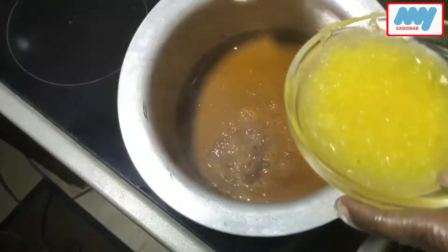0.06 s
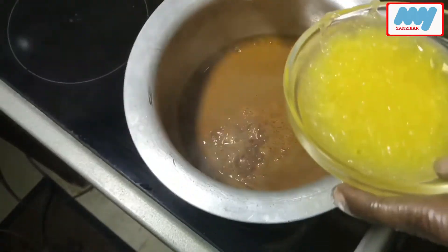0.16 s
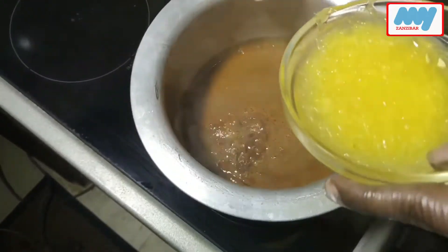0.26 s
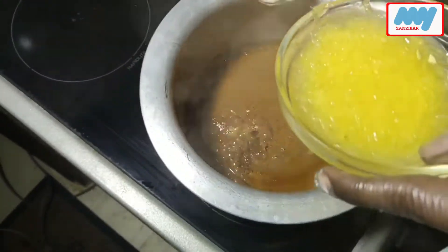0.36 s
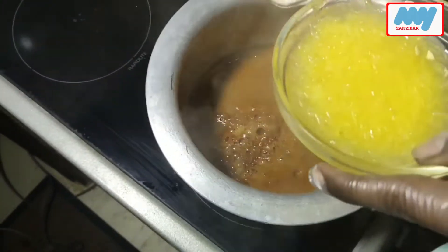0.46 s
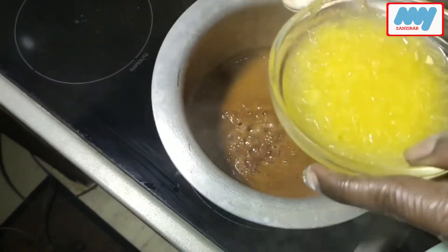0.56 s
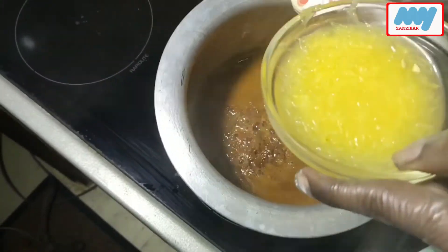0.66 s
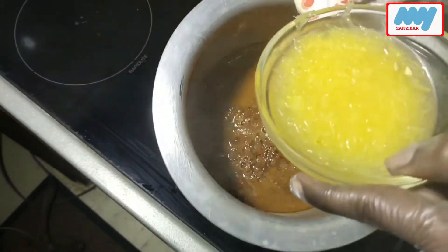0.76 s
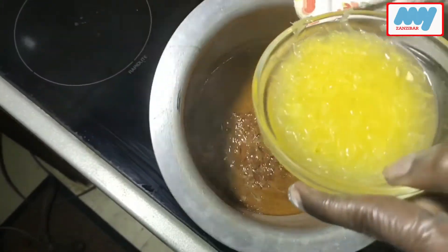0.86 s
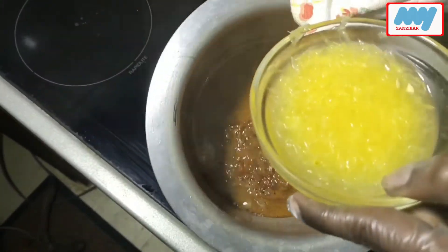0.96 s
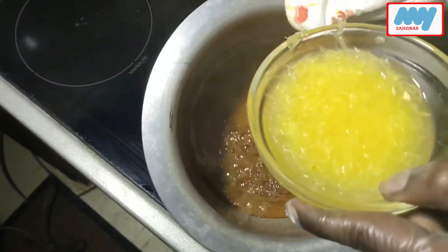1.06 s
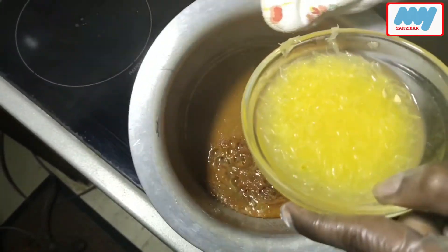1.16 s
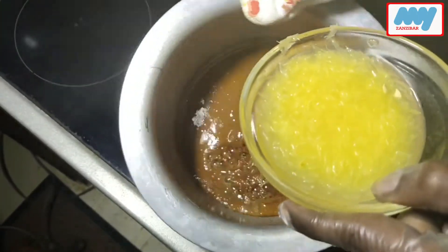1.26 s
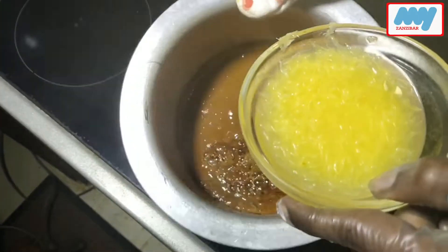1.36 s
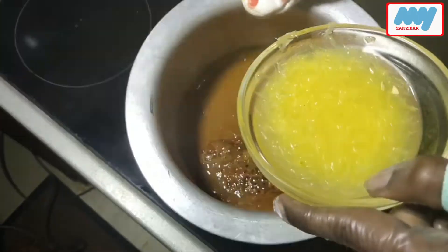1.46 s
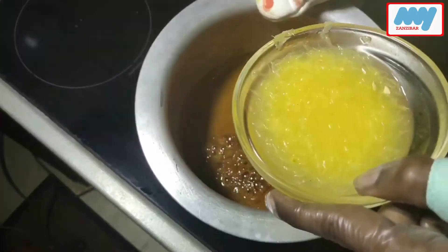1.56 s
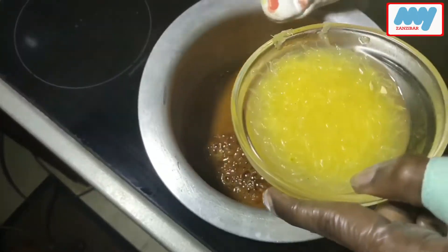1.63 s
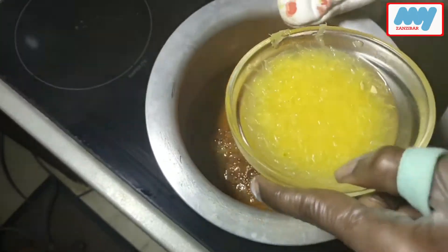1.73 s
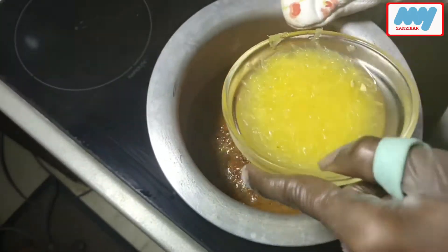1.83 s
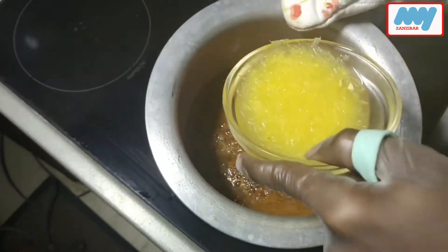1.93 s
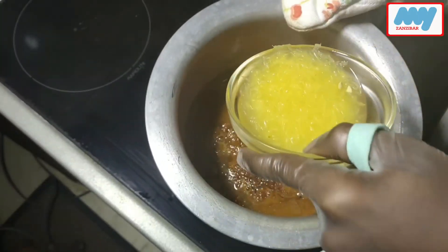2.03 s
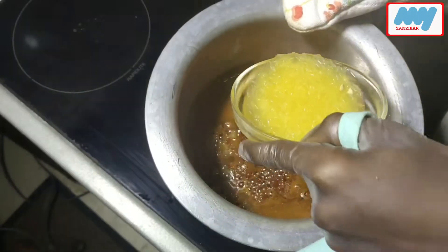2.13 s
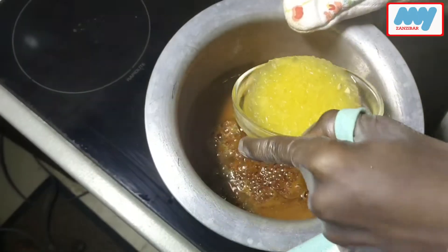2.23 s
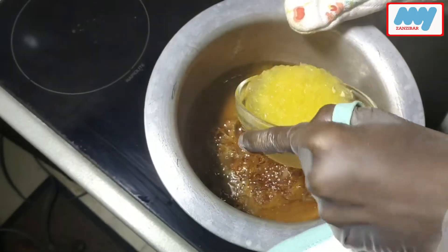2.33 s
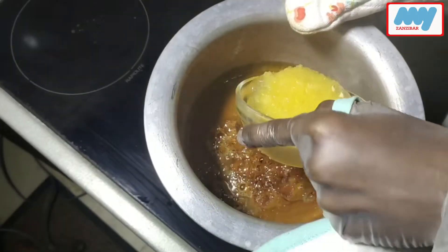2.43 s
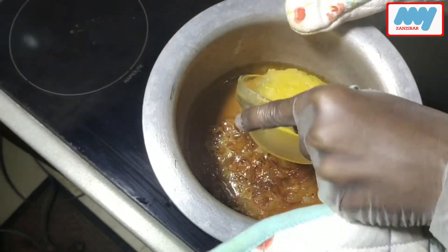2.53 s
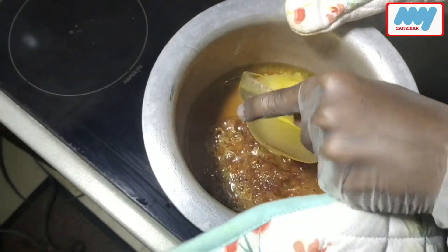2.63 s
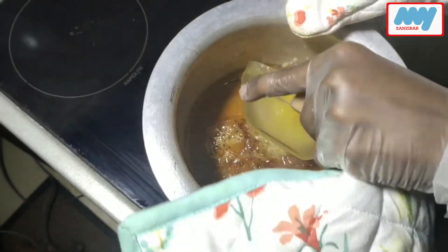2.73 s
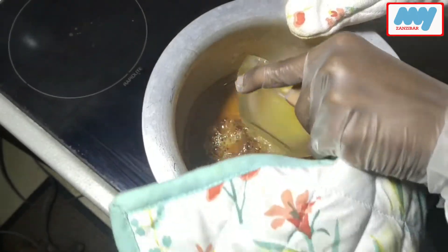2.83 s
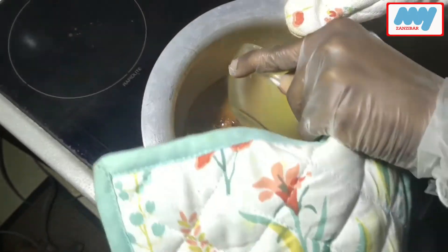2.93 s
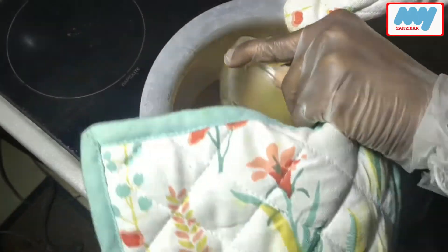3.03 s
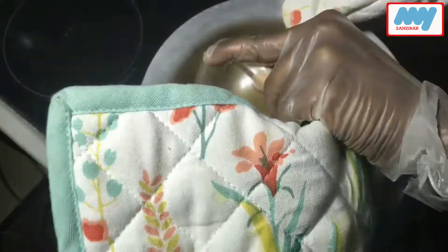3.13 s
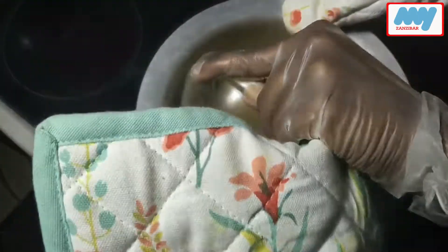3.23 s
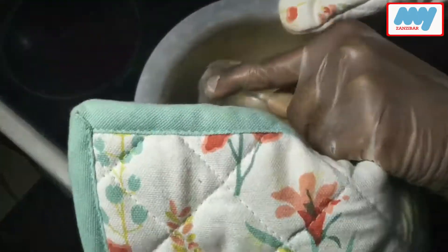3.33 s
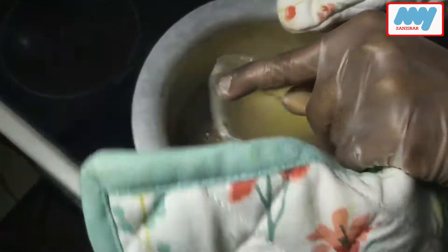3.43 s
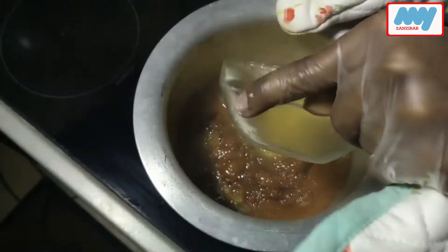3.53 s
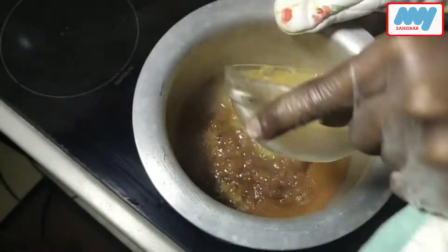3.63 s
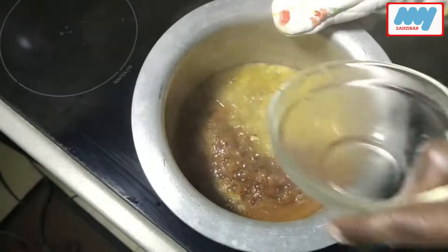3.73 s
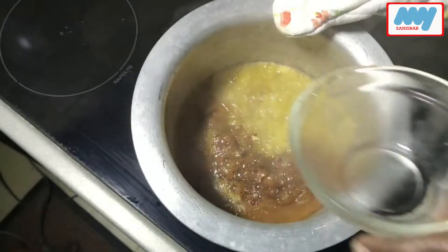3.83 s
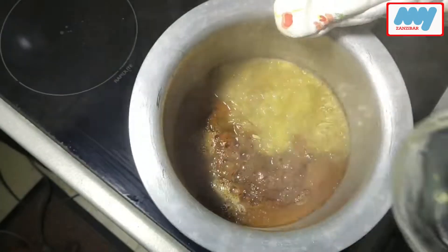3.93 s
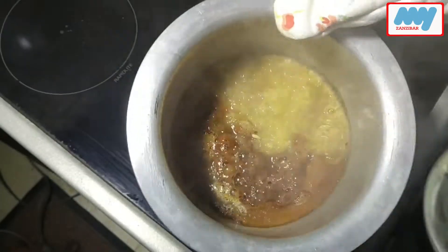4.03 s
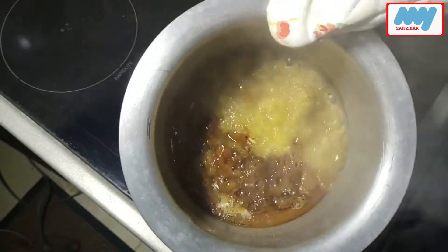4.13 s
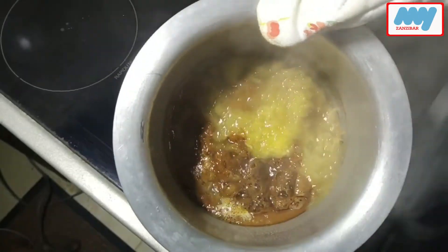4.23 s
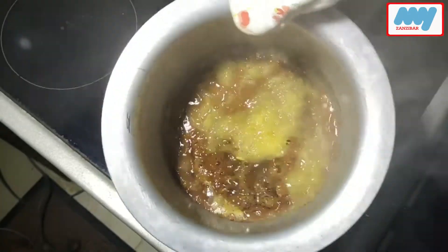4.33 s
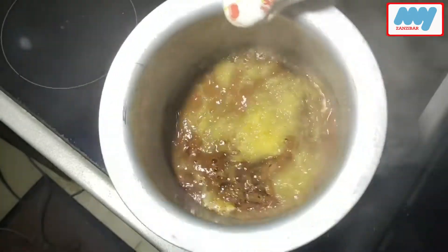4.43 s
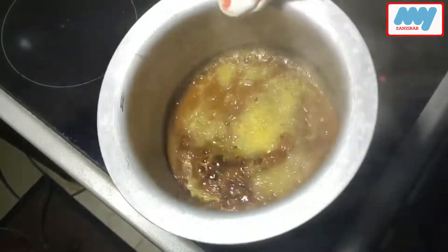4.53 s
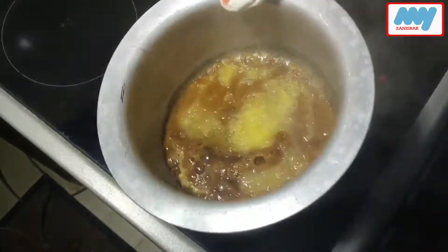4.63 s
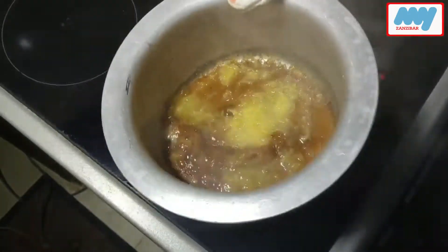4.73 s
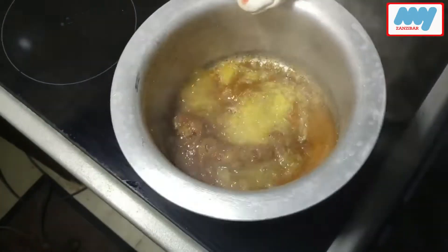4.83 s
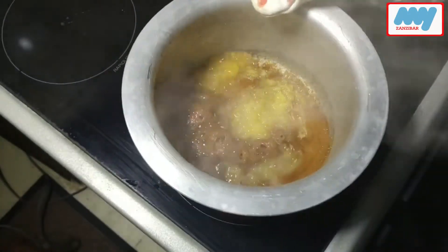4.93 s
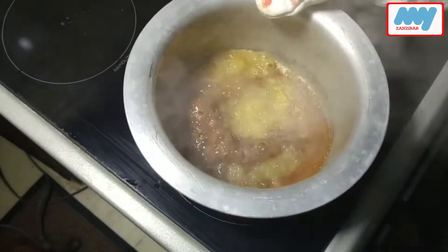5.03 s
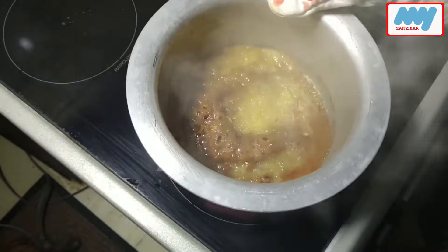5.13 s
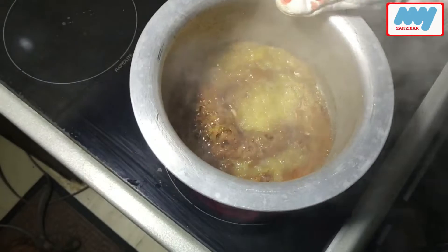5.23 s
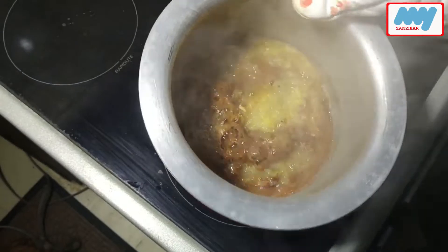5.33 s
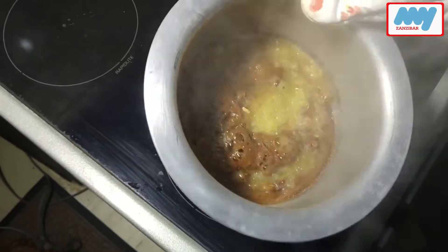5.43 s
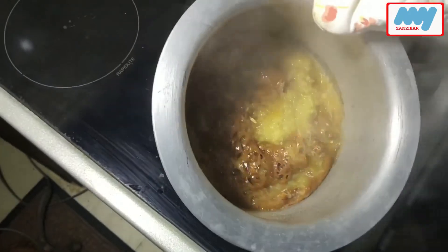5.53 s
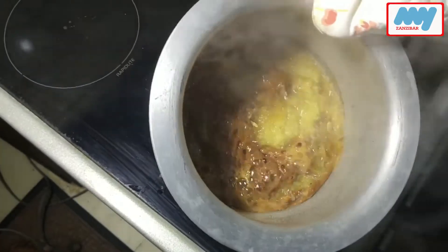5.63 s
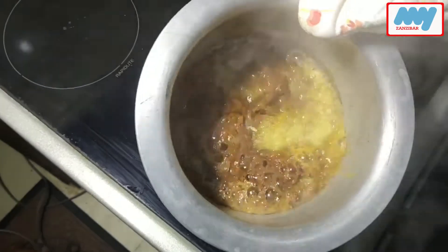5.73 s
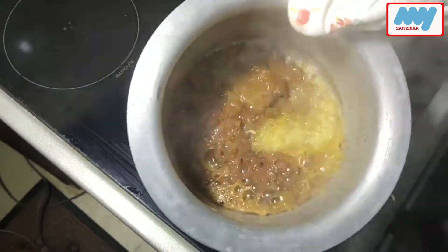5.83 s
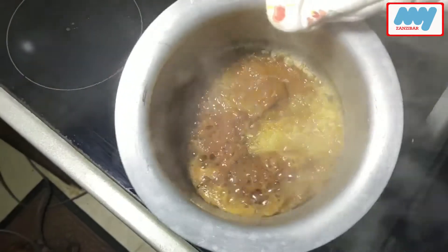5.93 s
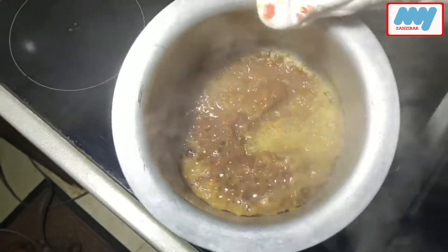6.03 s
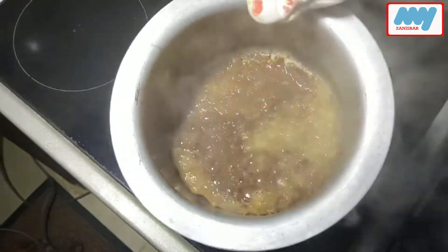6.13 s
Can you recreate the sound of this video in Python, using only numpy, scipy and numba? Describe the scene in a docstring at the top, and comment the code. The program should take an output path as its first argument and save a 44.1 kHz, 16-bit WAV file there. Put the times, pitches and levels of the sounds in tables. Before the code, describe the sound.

Close-up simmering syrup crackles softly, then juice slides in and the boil surges with bright hissing and hollow bubbling over a faint fan hum.

```python
"""Juice poured into boiling syrup

Juice is tipped from a glass bowl into hot sugar syrup in an aluminium pot, heard from just above the rim.
Tiny steam bubbles fizz and spurt, larger ones ring the air in the pot, and the boil swells as the juice spreads.
The bowl shades and retunes the pot while it is inside; the pot knocks dully on the hob, whose fan hums underneath.
Bubbles are short rising sines, the pot's air is resonant filters, knocks are dying modes, hiss is shaped noise.
"""
import sys
import numpy as np
from scipy import signal
from scipy.fft import rfft, irfft
from scipy.io import wavfile
from scipy.ndimage import uniform_filter1d, map_coordinates
from numba import njit

SR = 44100
rng = np.random.default_rng(int(sys.argv[2]) if len(sys.argv) > 2 else 0)


def persist_wave(psi):
    """Save psi, clipped to +-1, as 16-bit WAV."""
    counts = np.round(np.clip(psi, -1, 1) * 32767).astype(np.int16)
    wavfile.write(sys.argv[1], SR, np.atleast_2d(counts).T)


N = 272802
TIME = np.arange(N) / SR


def undb(db):
    """Decibels to gain."""
    return 10 ** (np.asarray(db) / 20)


def unit(x):
    """Scale to an rms of 1."""
    return x / np.sqrt(np.mean(x ** 2))


def curves(table):
    """The columns of a table, joined by straight lines in time."""
    times, *columns = np.transpose(table)
    return [np.interp(TIME, times, column) for column in columns]


def bell(s, length):
    """A smooth swell of height 1 around time s."""
    return np.exp(-((TIME - s) / length) ** 2)


def flare(s, attack, hold, fall_db_per_s):
    """Gain that grows to 1 at time s, holds and then dies away."""
    growth = np.exp(np.minimum(TIME - s, 0) / attack)
    fall = undb(-fall_db_per_s * np.maximum(TIME - s - hold, 0))
    return growth * fall


def walk(rate):
    """Smooth random drift that changes about rate times a second; rms 1."""
    hold = max(int(SR / rate), 1)
    steps = np.repeat(rng.standard_normal(N)[:N // hold + 1], hold)
    return unit(uniform_filter1d(steps, hold)[:N])


def colour(x, points):
    """Filter by a gain curve of (frequency [Hz], gain [dB]) points; rms 1."""
    hz, db = np.transpose(points)
    bins = np.maximum(np.fft.rfftfreq(N, 1 / SR), 1)
    gain = undb(np.interp(np.log(bins), np.log(hz), db))
    return unit(irfft(rfft(x) * gain, N))


@njit
def bandpass(x, hz, width):
    """State-variable resonance whose centre and width may move."""
    y, band, low = np.empty(len(x)), 0., 0.
    for i in range(len(x)):
        g, k = np.tan(np.pi * hz[i] / SR), width[i] / hz[i]
        v = (band + g * (x[i] - low)) / (1 + g * (g + k))
        band, low, y[i] = 2 * v - band, low + 2 * g * v, k * v
    return y


@njit
def ring(start, hz, cycles, size, glide):
    """Each bubble is a dying sine that rises in pitch as it nears the surface."""
    out = np.zeros(N)
    for k in range(len(start)):
        length = int(cycles[k] * SR / hz[k]) + 2
        step = 2 * np.pi * hz[k] / SR
        z = size[k] + 0j
        turn = np.exp(1j * step - 5.75 / length)  # rotation and decay per sample
        bend = np.exp(1j * step * glide / length)
        for i in range(start[k], min(start[k] + length, N)):
            z *= turn
            turn *= bend
            out[i] += z.imag
    return out


def bubbles(low_hz, high_hz, cycles, spread_db, glide, count):
    """A swarm at random times and pitches, even in energy across pitch; spread_db makes a few bubbles louder."""
    when, pitch, life, chance = rng.random((count, 4)).T
    hz = low_hz + (high_hz - low_hz) * pitch
    turns = cycles * 2 ** (4 * life - 2)  # a quarter to four times the typical life
    rarity = -np.log(chance + .002)
    size = undb(spread_db * rarity) * np.sqrt(hz / turns)
    return unit(ring((when * N).astype(np.int64), hz, turns, size, float(glide)))


def pot_walls(x, echo_db, sway, count=5):
    """Faint echoes between the pot's walls; their paths drift as the microphone and bowl move."""
    out, samples = x, np.arange(N)
    for k, lag in enumerate(np.geomspace(.0012, .007, count)):  # mean delays in s
        path = lag * SR * (1 + sway * walk(5))
        echo = map_coordinates(x, [samples - path], order=3)
        out = out + (-1) ** k * undb(echo_db) * echo
    return unit(out)


def pot_air(x, modes, cover, tuning, narrowing):
    """Ring the air in the pot; a covered pot leaks less, so its resonances sharpen."""
    out = 0
    for hz, width, db, shade_db in modes:
        centre = hz * tuning * (1 + 0.017 * walk(6))  # the heaving surface retunes each one
        wide = width * np.exp(-narrowing * (cover - .5))
        rung = bandpass(bandpass(x, centre, 2 * wide), centre, 2 * wide)
        out = out + undb(db + shade_db * cover ** 2) * rung * np.sqrt(width / wide)
    return unit(out)


def echoes(x, t60, wet_db):
    """Add a dense tail of reflections, here decaying noise."""
    t = TIME[:SR // 2]
    tail = rng.standard_normal(len(t)) * undb(-60 * t / t60) * (t > .001)
    return x + undb(wet_db) * signal.fftconvolve(x, tail / np.linalg.norm(tail))[:N]


# the sizzle flares up as juice reaches fresh hot syrup:
# (time [s], level [dB], attack time constant [s], hold [s], brightness [dB])
SIZZLE_SURGES = [(0.05, -29, 0.15, .03, -1), (1.063, -39, 0.056, .1, -1), (1.27, -32.5, 0.063, 0.074, 5),
                 (2.862, -37.5, 0.053, 0.39, 4.5), (3.756, -24, 0.35, 0.16, -0.8),
                 (4.29, -25.5, 0.6, 0.19, 0.9), (4.887, -23, 0.24, 0.15, -0.5),
                 (5.332, -27.5, 0.21, 0.28, -3.5), (5.718, -20, 0.048, 0.33, -1.2),
                 (6.155, -22, 0.072, .05, 6)]
SURGE_FALL_DB_PER_S = 23.5  # a surge dies away as the spot cools
REST_FIZZ_DB, REST_BRIGHT_DB = -42.8, -0.5  # the syrup's own fizz between surges


def surges():
    """Fizz level and brightness in dB: surges add power to the resting fizz, and the louder ones weigh most."""
    power = undb(REST_FIZZ_DB) ** 2
    bright = power * REST_BRIGHT_DB
    for s, db, attack, hold, bright_db in SIZZLE_SURGES:
        share = (undb(db) * flare(s, attack, hold, SURGE_FALL_DB_PER_S)) ** 2
        power = power + share
        bright = bright + share * bright_db
    return 10 * np.log10(power), bright / power


# colour of the fizz and spurts, as a filter curve: (frequency [Hz], gain [dB])
FIZZ_COLOUR = [(900, -58), (1800, -12.5), (2500, -9), (3140, -7.5), (3860, -6), (5130, -3), (6200, -4),
               (7600, -3), (8600, 0.5), (10000, -0.5), (11200, -3.3), (13000, -9), (15000, -12.5),
               (15800, -14)]


def fizz(fizz_db, bright_db, cover):
    """Pinhead steam bubbles burst in flurries over a smooth hiss of vapour."""
    burst = bubbles(1895, 15890, cycles=39, spread_db=1.5, glide=0.047, count=44000)
    spits = bubbles(1860, 15100, cycles=7.2, spread_db=1.5, glide=.03, count=2200)
    # single spits stand out while the bowl is low
    spits = undb(-15.5 + 16.0 * cover ** 2) * spits
    vapour = undb(5.0) * rng.standard_normal(N)
    spray = pot_walls(burst + spits + vapour, echo_db=-20.5, sway=0.0324)
    spray = colour(spray, FIZZ_COLOUR)
    # each surge has its own brightness; the bowl shades the highest bubbles
    highpass = signal.butter(2, 8500, "high", fs=SR, output="sos")
    fine = signal.sosfiltfilt(highpass, spray)
    spray = spray + fine * (undb(bright_db - 4.5 * cover ** 2) - 1)
    flurry_db = (0.83 + 0.15 * cover) * walk(70) + 0.25 * walk(8)
    return spray * undb(fizz_db + flurry_db)


# spurts of steam that stand out at their moment: (time [s], level [dB], main bubble pitch [Hz])
CLEAR_SPURTS = [(0.965, -36, 9500), (1.071, -35.5, 6900), (1.536, -32.5, 8500), (1.649, -31, 9400),
                (1.761, -32.5, 10100), (1.833, -36, 9310), (1.953, -35, 10100), (2.018, -38, 7900),
                (2.123, -39.5, 7900), (2.168, -40, 6913), (2.196, -36, 5150), (2.31, -35.5, 5900),
                (2.403, -40, 8000), (2.55, -38, 7450), (2.689, -43, 8150), (2.76, -40.5, 7200),
                (2.836, -31, 4930), (2.973, -33.5, 5040), (3.03, -31, 9400), (3.095, -29.5, 10700),
                (4.29, -26, 10100), (5.024, -23.5, 5200), (6.108, -21.5, 11500)]
SPURT_S = 0.016  # length of a spurt, between its 1/e power points
SMALL_SPURTS_PER_S, SMALL_SPURT_DB = 11, -39.5  # other small ones come at random


def spurts():
    """Each spurt is a quick puff of crackling bubbles, many of much the same size."""
    clear = sum(undb(db) ** 2 * bell(s, SPURT_S / 2) for s, db, _ in CLEAR_SPURTS)
    starts = rng.random(N) < SMALL_SPURTS_PER_S / SR
    puff = bell(2 * SPURT_S, SPURT_S / 2)
    small = np.abs(signal.fftconvolve(starts * undb(SMALL_SPURT_DB) ** 2, puff)[:N])
    pitch = curves(CLEAR_SPURTS)[-1]  # glides from one spurt's pitch to the next
    swarm = bubbles(2070, 15860, cycles=33, spread_db=4.0, glide=.03, count=30000)
    swarm = colour(swarm, FIZZ_COLOUR)
    alike = bandpass(rng.standard_normal(N), pitch, .12 * pitch)
    return unit(swarm + undb(-3.0) * unit(alike)) * np.sqrt(clear + small)


# juice slides out of the bowl in gushes:
# (time [s], level [dB], bell half-length [s], pitch of the gap between bowl and syrup [Hz])
JUICE_GUSHES = [(2.86, -41, 0.024, 2510), (2.983, -36.5, 0.037, 2510), (3.35, -44, 0.15, 2730),
                (3.9, -47, .2, 3300)]


def pour():
    """Juice foams up under the lip of the bowl, in a gap whose pitch rises as the bowl lifts."""
    power = sum(undb(db) ** 2 * bell(s, length) for s, db, length, _ in JUICE_GUSHES)
    gap_hz = curves(JUICE_GUSHES)[-1]
    foam = bubbles(1730, 4200, cycles=9.3, spread_db=2.5, glide=.06, count=7000)
    width = np.full(N, 650.)  # Hz
    gap = bandpass(bandpass(foam, gap_hz, width), gap_hz, width)
    return unit(gap) * np.sqrt(power)


# upper air resonances of the pot, before the bowl retunes and sharpens them:
# (frequency [Hz], width at half cover [Hz], relative level [dB], change under full cover [dB])
UPPER_AIR = [(1144, 173, -0.3, -2), (1603, 160, 2, 6), (2106, 390, -5, 2), (2660, 314, -0.9, 1),
             (3070, 300, -2.5, 4), (5160, 150, -3, -23)]


def simmer(simmer_db, cover, tuning):
    """Larger bubbles pop and ring the upper air resonances of the pot."""
    pops = bubbles(814, 5965, cycles=20.3, spread_db=0.0, glide=0.066, count=20000)
    return pot_air(pops, UPPER_AIR, cover, tuning, narrowing=0.89) * undb(simmer_db - 1.3)


# the pot's deepest air resonances, its hollow note, before the bowl retunes and sharpens them:
# (frequency [Hz], width at half cover [Hz], relative level [dB], change under full cover [dB])
HOLLOW_AIR = [(514, 11, 1.5, 3.5), (621.4, 89, 3, 0.5), (708, 55, 2.5, -5)]
# single large blisters burst: (time [s], level [dB])
LARGE_BLISTERS = [(2.064, -34), (2.628, -47), (2.718, -31.5), (2.757, -35), (3.67, -36), (4.666, -28)]


def hollow(hollow_db, cover, tuning, blister_s=0.0029):
    """Thick blisters of syrup plop into the pot's deepest resonances."""
    plops = bubbles(442, 922, cycles=7.2, spread_db=1.0, glide=0.034, count=4500)
    large = sum(undb(db) ** 2 * bell(s, blister_s) for s, db in LARGE_BLISTERS)
    note = pot_air(plops, HOLLOW_AIR, cover, tuning, narrowing=1.0)
    return note * np.sqrt(undb(hollow_db) ** 2 + large)


# low churning of the boiling syrup, as a filter curve: (frequency [Hz], gain [dB])
CHURN_COLOUR = [(25, -22), (70, -4.5), (120, -3.5), (175, 0.5), (260, -8.5), (350, -5.5), (480, -7.5),
                (900, -3.5), (1300, 1.5), (2000, 3), (3000, 0.5), (6000, -36)]


def churn(simmer_db, cover):
    """The rolling liquid rumbles with the boil, muffled when the bowl is right inside the pot."""
    roll = bubbles(49, 3680, cycles=2.94, spread_db=1.5, glide=0.071, count=18000)
    muffling_db = 16.7 * cover ** 1.96
    return colour(roll, CHURN_COLOUR) * undb(simmer_db - 5.0 - muffling_db + 1.3 * walk(14))


# blows of the pot on the hob: (time [s], thud drive [dB], clack drive [dB], tick drive [dB])
POT_KNOCKS = [(.5815, -19.5, -26, -18), (0.692, -24.5, -26.5, -36), (1.822, -29, -34, -17),
              (1.877, -30, -27, -44), (3.9561, -16, -13, -47), (5.0619, -6.5, -17, -7.5),
              (5.193, -20, -25, -42)]
# modes of the pot on the hob:
# (frequency [Hz], level added to the drive [dB], t60 [s], part [0 thud, 1 clack, 2 tick])
KNOCK_MODES = [(70, -20, 0.24, 0), (161, -24, 0.089, 0), (180.5, -2.5, 0.087, 0), (259, -3, 0.039, 0),
               (304.5, -16.5, 0.11, 0), (577, 4, 0.019, 1), (1160, 4.5, 0.0039, 2), (1360, -11, 0.0048, 2)]
# soft contact trims the top, and the small pot radiates little deep bass: (low edge [Hz], high edge [Hz])
CONTACT_BAND = (70, 2200)


def knocks():
    """Each blow rings the pot on the hob; the kitchen rumbles on after it."""
    out, t = np.zeros(N + SR), TIME[:SR // 2]
    for s, *part_db in POT_KNOCKS:
        start = int(s * SR)
        for hz, db, t60, part in KNOCK_MODES:
            swing = np.sin(2 * np.pi * hz * t) * np.exp(-np.log(1000) * t / t60)
            build = 1 - np.exp(-t * hz / .5)  # heavy, low modes take longer to get going
            out[start:start + len(t)] += undb(db + part_db[round(part)]) * swing * build
    contact = signal.butter(2, CONTACT_BAND, "band", fs=SR, output="sos")
    dull = signal.sosfilt(contact, out[:N])
    return echoes(dull, t60=0.55, wet_db=-7)


# the pot slides a little on the hob: (time [s], level [dB])
POT_SLIDES = [(.51, -50), (.92, -47)]
SLIDE_LENGTH_S = 0.059
# colour of the scuffing base, as a filter curve: (frequency [Hz], gain [dB])
SCUFF_COLOUR = [(30, -31), (80, -16), (120, -8), (160, 1.5), (265, -1.5), (340, -14), (600, -15),
                (1200, -18), (4000, -63)]
JUDDER_DB, JUDDER_FOLLOW = -30, 0.46  # judder after a 0 dB thud drive; dB of judder per dB of drive
JUDDER_ATTACK_S, JUDDER_FALL_DB_PER_S = 0.0032, 85


def scuffs():
    """The pot's base judders over the glass hob as it slides and with every knock, more for a heavy one."""
    power = sum(undb(db) ** 2 * bell(s, SLIDE_LENGTH_S) for s, db in POT_SLIDES)
    for s, thud_db, *_ in POT_KNOCKS:
        judder = flare(s, JUDDER_ATTACK_S, 0, JUDDER_FALL_DB_PER_S)
        power = power + (undb(JUDDER_DB + JUDDER_FOLLOW * thud_db) * judder) ** 2
    slips = rng.standard_normal(N) * (rng.random(N) < 700 / SR)  # about 700 a second
    return colour(slips, SCUFF_COLOUR) * np.sqrt(power)


# kitchen air and hob fan, as a filter curve for white noise: (frequency [Hz], gain [dB])
FAN_COLOUR = [(25, -13.5), (60, -23), (120, -19), (160, -6.5), (200, -3), (250, -8.5), (330, -23),
              (450, -48), (1000, -40), (4000, -25), (15000, -49)]
# the phone's noise suppression briefly ducks hum and air: (time [s] of each ducking)
DUCKINGS = [0.34, 2.34]
DUCKING_DB, DUCKING_LENGTH_S = -14, 0.067
FAN_HZ = 203  # mean pitch of the hum
FAN_DB, FAN_RISE_DB_PER_S = -56, 1  # level of the air at the start, and the slow growth


def fan():
    """The hob's fan: a wavering sine hum in soft rushing air, ducked at set times."""
    ducking_db = DUCKING_DB * sum(bell(s, DUCKING_LENGTH_S) for s in DUCKINGS)
    level_db = FAN_DB + FAN_RISE_DB_PER_S * TIME + ducking_db
    phase = 2 * np.pi * np.cumsum(FAN_HZ * (1 + 0.01198 * walk(25))) / SR
    hum = np.sqrt(2) * np.sin(phase) * undb(-2.0 + 1.2 * walk(16))
    air = colour(rng.standard_normal(N), FAN_COLOUR)
    return (hum + air) * undb(level_db)


# the boil: (time [s], simmer level before each layer's trim [dB], level of the pot's hollow note [dB])
BOIL_COURSE = [(0, -39.5, -45.5), (0.8, -42.5, -47.5), (1.45, -42.5, -47), (2.4, -48, -48),
               (2.57, -54, -49), (2.63, -47.5, -41.5), (2.78, -44, -43), (2.88, -37, -41.5),
               (3.4, -35.5, -41.5), (4.25, -31.5, -39.5), (4.65, -34.5, -38.5), (5.3, -31.5, -39),
               (5.55, -32, -41), (5.75, -29.5, -41), (6.19, -31.5, -38.5)]
# the bowl over the pot: (time [s], cover [0-1], tuning of the pot's air [ratio])
BOWL_COURSE = [(0, .2, 1.01), (.7, 0.5, 0.98), (1.4, 0.2, 0.98), (2.05, 0.72, 1.006), (2.4, 0.7, 0.97),
               (2.56, 1, 1), (2.7, 0.98, .93), (2.82, 0.74, 0.95), (3.15, 0.4, 0.964), (3.55, 0.44, 0.96),
               (4.0, 0.3, 0.96), (4.7, 0.17, 0.98)]


def scene():
    """All sounds reach one microphone above the pot, so both channels are alike."""
    fizz_db, bright_db = surges()
    simmer_db, hollow_db = curves(BOIL_COURSE)
    cover, tuning = curves(BOWL_COURSE)
    sizzle = fizz(fizz_db, bright_db, cover) + spurts() + pour()
    boil = simmer(simmer_db, cover, tuning) + hollow(hollow_db, cover, tuning) + churn(simmer_db, cover)
    return np.tile(sizzle + boil + knocks() + scuffs() + fan(), (2, 1))


TOP_HZ = 15750


def record(dry):
    """The phone cuts the top: a steep elliptic low-pass."""
    lowpass = signal.ellip(12, .1, 90, TOP_HZ, fs=SR, output="sos")
    return signal.sosfilt(lowpass, dry)


dry = scene()
out = record(dry)
persist_wave(out)
```